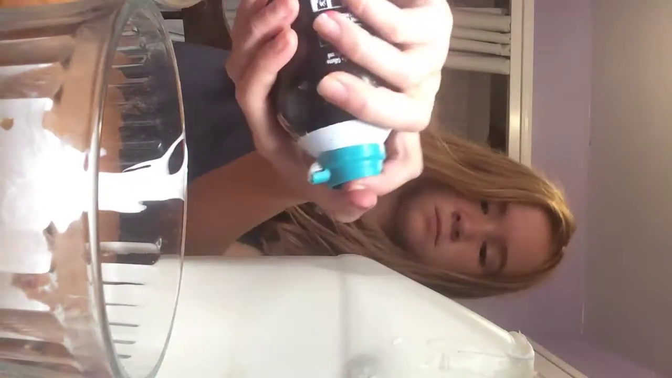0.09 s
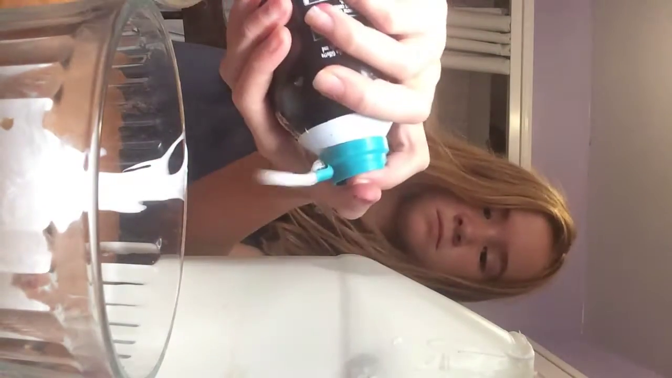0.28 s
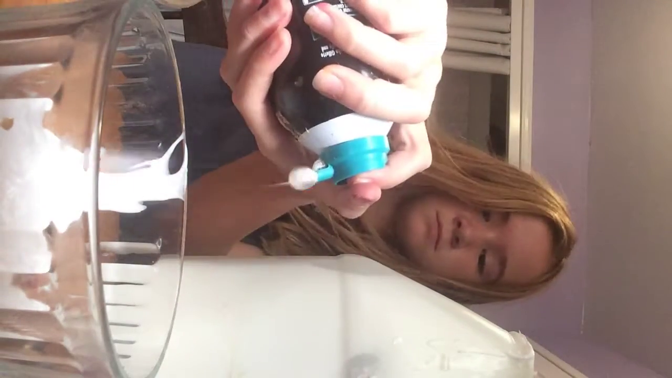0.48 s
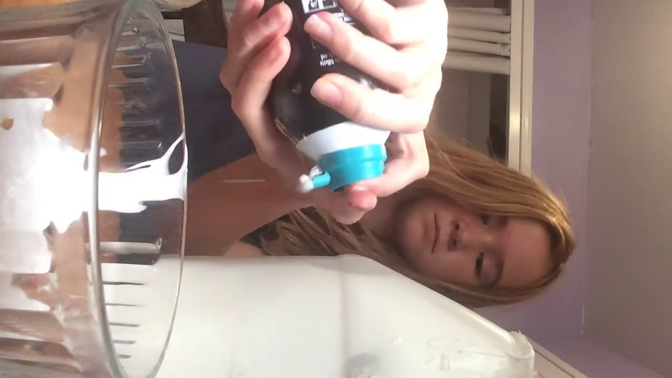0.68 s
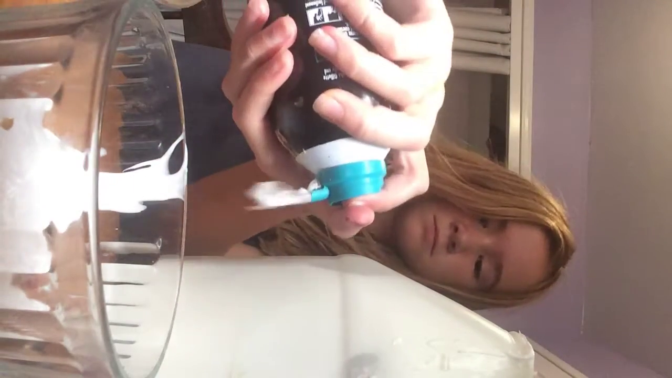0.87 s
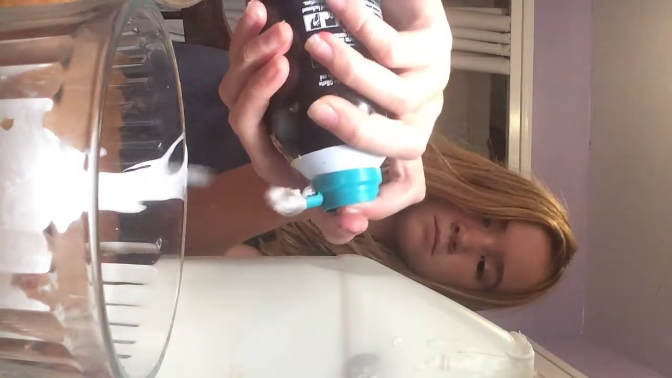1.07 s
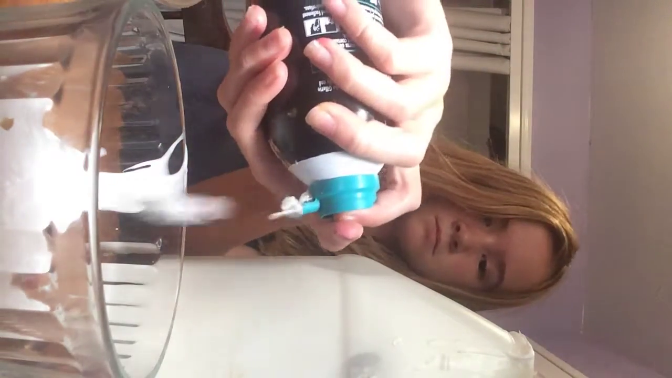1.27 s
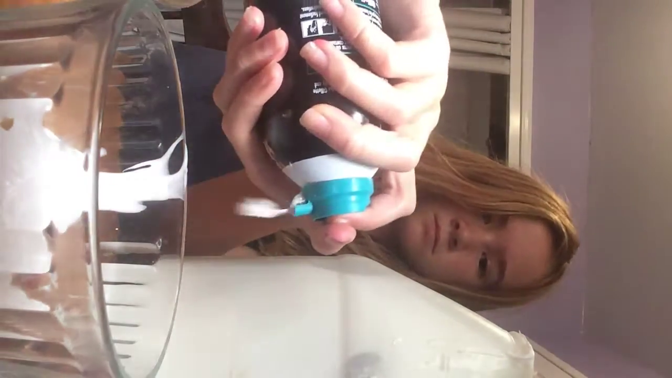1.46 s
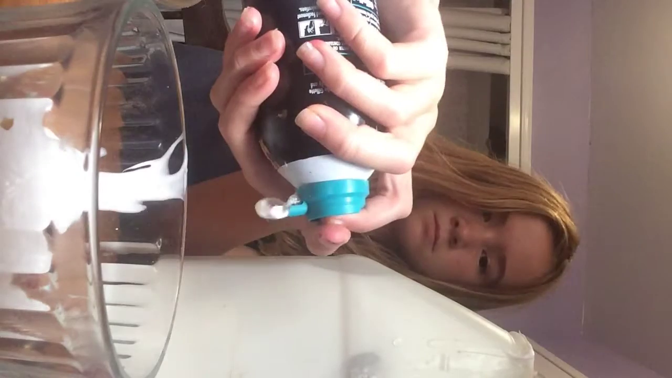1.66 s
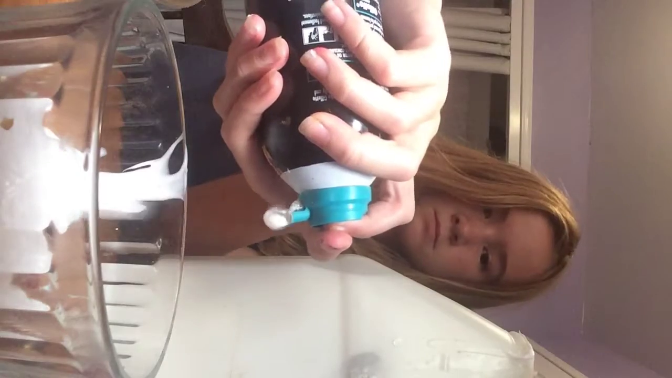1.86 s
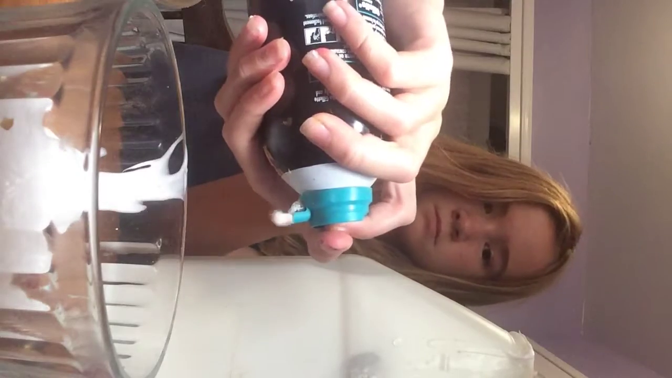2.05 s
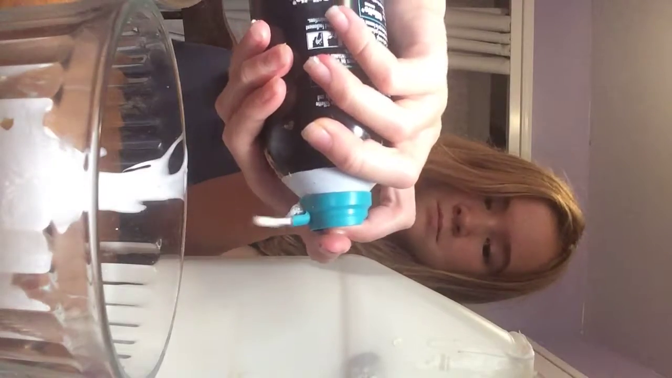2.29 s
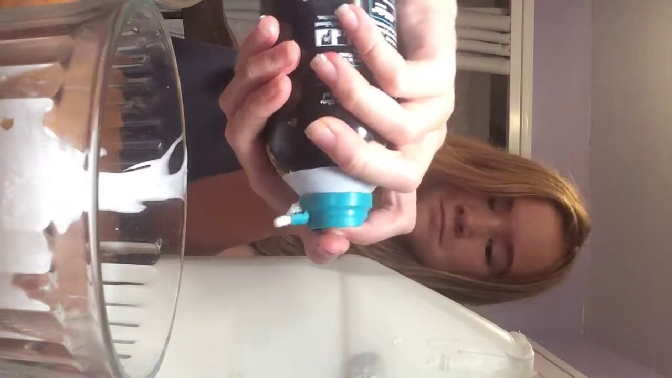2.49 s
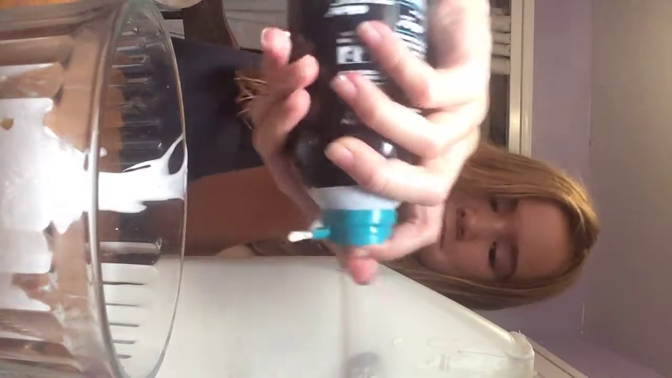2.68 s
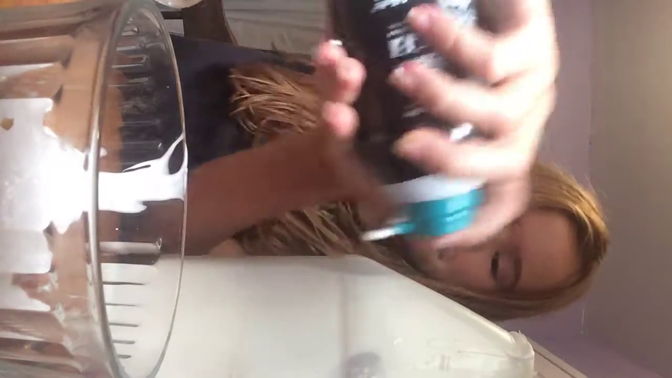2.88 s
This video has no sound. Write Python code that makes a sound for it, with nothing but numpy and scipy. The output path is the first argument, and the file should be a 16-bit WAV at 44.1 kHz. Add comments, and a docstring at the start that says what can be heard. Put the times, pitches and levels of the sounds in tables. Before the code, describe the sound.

An aerosol foam can sputters close to a phone in a small room. Around 0.1-0.3 s gas leaks with a breathy sinking whistle; from 0.4 s weak spits grow into rapid, uneven, gritty crackles, strongest near 1.9 s, ending about 2.7 s. Barely audible knocks come at 0.3 and 0.5 s, a clearer one at 2.7 s, then a tiny bubble pop at 2.8 s. Low rumble; faint hum after 2.2 s.

```python
"""An aerosol can held over a glass bowl spits foam in a small room, close to a phone, over a low rumble.
First gas leaks through the spout: breathy tones at several multiples of one sinking pitch, blurred at random.
Then plugs of foam leave in quick, gritty spurts: noise in four bands, shaped by the rings of spout and bowl.
Gas seeps between them; two soft knocks come early, one near the end, each made of dying sine waves.
A faint low glide comes midway; later a hum sounds with two more soft tones; a last bubble bursts as a short sine."""
import sys
import numpy as np
from scipy import signal
from scipy.fft import rfft, irfft, next_fast_len
from scipy.io import wavfile
from scipy.ndimage import uniform_filter1d, map_coordinates

SR = 44100
rng = np.random.default_rng(int(sys.argv[2]) if len(sys.argv) > 2 else 0)


def digitize_waveform(pressure):
    """Quantize a signal to 16-bit integers and store it at the path in sys.argv[1].

    Rows of a 2-D input are taken as channels; values are limited to [-1, 1].
    """
    field = np.atleast_2d(pressure).T
    bounded = np.clip(field, -1, 1)
    quanta = np.round(bounded * 32767).astype(np.int16)
    wavfile.write(sys.argv[1], SR, quanta)


N = 130095  # length of the scene in samples

# The low rumble's colour. Each row: frequency in Hz, relative strength in dB per Hz.
RUMBLE_COLOUR = [(33, -35.5), (58, -3.5), (140, -2.5), (210, -7), (310, -21), (430, -15), (900, -35),
                 (2690, -36), (16000, -46.5)]
RUMBLE_DB = -56

# How fast the room's echo dies. Each row: frequency in Hz, time to fall by 60 dB in seconds.
ROOM_DECAY = [(1700, 0.19), (6000, 0.13), (14000, 0.13)]
ROOM_DB = -9  # echo against the direct sound

# Soft knocks. Each row: start in seconds, level in dB, pitch as a multiple of the table's tones.
KNOCK_TIMES = [(0.317, -47.5, 3.24), (0.52, -45.5, 0.98), (2.685, -30.5, 3.34)]
# The table's tones at pitch 1. Each row: frequency in Hz, level in dB, time to fall by 60 dB in seconds.
TABLE_TONES = [(88, 5, 0.12), (229.6, 6, 0.16)]
# A last bubble bursting. Each row: start in seconds, level in dB before its soft onset, pitch in Hz.
BUBBLES = [(2.817, -56.5, 2410)]

# The faint hum's path. Each row: time in seconds, pitch in Hz, level in dB.
HUM_PATH = [(2.2, 279.5, -61.5), (2.26, 276.5, -56), (2.36, 284.5, -56.5), (2.45, 285.3, -50.5),
            (2.57, 284.3, -61), (2.68, 286.6, -50.5), (2.83, 283.6, -49.5), (2.9, 288.3, -64)]
# Other soft tones. Each row: start in seconds, length in seconds, first Hz, last Hz, level at the top in dB.
GLIDE_TONES = [(1.032, 0.67, 57, 74.1, -57.5), (2.244, 0.21, 378, 375, -61.5), (2.532, 0.18, 243, 196, -55)]

# The first leak. Each row: time in seconds, tube pitch in Hz, level in dB.
LEAK_PATH = [(.09, 3330, -104), (.105, 3400, -63.5), (.13, 2950, -63.5), (.17, 2440, -59), (.24, 2360, -50),
             (.29, 2230, -68.5), (.42, 2150, -68)]
# The tube's tones. Each row: multiple of the pitch, relative level in dB.
TUBE_TONES = [(1, -8), (2, 4), (2.6, 4.5), (3, 3), (4.7, -4), (6.2, 4)]
LEAK_WOBBLES_PER_S, LEAK_AIR_DB = 650, -4  # breathiness of the lowest tone; hiss against the tones

# Spurts of gas. Each row: start in seconds, length in seconds, level in dB,
# middle band over that level in dB, treble over that level in dB.
SPURT_TIMES = [(0.241, 0.0071, -39, 2.5, 3.5), (0.398, 0.056, -43.5, -14, -19),
               (0.415, 0.019, -38.5, 5, -5), (0.458, 0.031, -36.5, -3.5, -52),
               (0.477, 0.022, -31, 5.5, -9.5), (0.499, 0.017, -31, 4.5, -0.5), (0.519, 0.033, -32, 0, -2.5),
               (0.567, 0.013, -25.5, -6.5, -21), (0.58, 0.016, -30.5, -0.5, -19.0),
               (0.615, 0.018, -29, 3, -18), (0.655, 0.0063, -27.5, -10, -21), (0.68, 0.0085, -25, -1, -23),
               (0.696, 0.0027, -27.5, 9.5, -8), (0.713, 0.01, -26.5, 0.0, -2),
               (0.722, 0.024, -36, -3.5, -8.5), (0.784, 0.019, -27, -8, -31),
               (0.813, 0.026, -33.5, 1.5, -1), (0.875, 0.02, -27.5, -16, -31),
               (0.887, 0.0048, -25.5, 9, -13), (0.935, 0.013, -27.5, -2, -28),
               (0.975, 0.0071, -25.5, 1.5, -7.5), (0.986, 0.028, -29.5, -2.5, -7.5),
               (1.038, 0.0035, -20.5, -5, -14), (1.044, 0.01, -29.5, 2.5, 0.5),
               (1.091, 0.004, -27, -14, -21), (1.097, 0.014, -26.5, 2.5, -10.5), (1.15, 0.021, -26, 0, -8),
               (1.206, 0.032, -29, 3, -3), (1.272, 0.017, -25, -5.5, -22), (1.286, 0.009, -28, 3, -31),
               (1.328, 0.0056, -25.5, 0.5, -20), (1.365, 0.0075, -21, -4.5, -11.5),
               (1.399, 0.0071, -26, -5, -8.5), (1.423, 0.0075, -24.5, -9, -13),
               (1.458, 0.012, -25, -8, -18.5), (1.472, 0.01, -31.5, 1, -16),
               (1.535, 0.012, -26, -4.5, -8.5), (1.599, 0.023, -28, 0, -6), (1.642, 0.013, -38.5, -6, -16),
               (1.681, 0.0092, -24.5, -6.5, -11.5), (1.695, 0.0084, -26.5, -3.5, -19),
               (1.74, 0.0066, -23.5, -8, -10.5), (1.807, 0.0054, -21, -10.5, -36),
               (1.819, 0.014, -23.5, 1, -24), (1.873, 0.018, -30.5, -8.5, -20.5),
               (1.889, 0.0062, -27.5, -13, -12), (1.937, 0.0036, -19.5, -7, -26),
               (1.944, 0.003, -15.5, -8, -8), (1.949, 0.012, -30.5, -6.5, -2.5),
               (2.005, 0.0083, -22.5, 3, -7.5), (2.043, 0.0057, -25.5, -5.5, -10.5),
               (2.052, 0.014, -30, -4, -4.5), (2.162, 0.022, -28.5, -2, -9), (2.223, 0.017, -28, -3, -2.5),
               (2.234, 0.038, -33, 0, -8), (2.258, 0.0033, -27, 1, -4.5), (2.294, 0.013, -26, -8, -10.5),
               (2.303, 0.027, -31.5, -6, -9), (2.383, 0.014, -27, -3, -12.5),
               (2.46, 0.01, -26.5, -4.5, -11), (2.479, 0.0078, -34, 4.5, -7), (2.537, 0.0087, -24, -9, -12),
               (2.553, 0.0089, -27.5, -9, -20), (2.598, 0.0031, -20.5, -22, -13.5),
               (2.603, 0.023, -30.5, -3.5, -11.5), (2.673, 0.011, -34, -12, -18),
               (2.678, 0.02, -30, -7.5, -16.5)]
# Gas seeping between spurts. Each row: time in seconds, level in dB, extra level of the hollow band in dB.
SEEP_PATH = [(.14, -79, -9), (.25, -64, 7), (.33, -70.5, 4), (.39, -61, 36.5), (1.25, -66.5, 37.5),
             (2, -48, -4), (2.12, -79.5, -12), (2.7, -61, 3), (2.8, -82, -11)]
# The jet's own colour. Each row: frequency in Hz, relative strength in dB per Hz.
JET_COLOUR = [(250, -34), (650, -44.5), (1300, -35), (1550, -17.5), (2200, -1.5), (2900, -12.5),
              (4400, -14), (5600, -21), (7300, -23), (10100, -32.5), (16000, -45)]
# Rings of spout and bowl. Each row: frequency in Hz, width at half height in Hz, relative level in dB.
SPOUT_RINGS = [(922, 240, -23.5), (1706.6, 23, -2), (2499, 220, 1.5), (3140, 146, 0), (3670, 53, -6.5),
               (5220, 437, -5), (6030, 736, -2.5), (7790, 140, -16.5)]
# The spout's ring brightens as it clears. Each row: time in seconds, tilt in dB per octave.
CLEARING_TILT = [(1.4, -0.5), (2.7, 9.5)]
TILT_HZ = 2630  # pivot of the tilt
# Borders between the hollow, body, middle and treble bands: three frequencies in Hz.
BAND_EDGES = (1350, 4200, 8000)

ATTACK_S, RELEASE_S, TREBLE_RELEASE_S = 0.0018, 0.0057, 0.0044
SAG_DB_PER_S = 151  # pressure sags while a spurt lasts
POP_DB, POP_S = -6, 0.0013  # the plug lets go with a pop
LEAD_DB, LEAD_S = -17, 0.0047  # a weak hiss swells before the plug lets go
SPITS_PER_S, SPIT_S, SPIT_DB = 380, 0.0017, 7  # bubbles tearing the jet: how often, decay, over the hiss
OWN_SPIT_DB = 2.5  # each band makes a spit stronger or weaker by about this much
PATCH_DB = 2.5  # scatter of the noise colour
HOLLOW_FOLLOWS, HOLLOW_DB = 0.61, -45.5  # the hollow band follows the spurt in part, about this level
HOLLOW_EARLY_S, TREBLE_LATE_S = 0.0047, 0.0037  # a spurt starts hollow and brightens as the spout clears

TOP_HZ, LOW_HZ = 15900, 34  # the phone's limits


def amp(db):
    """Turn dB into a factor."""
    return 10 ** (np.asarray(db) / 20)


def unit(x):
    """Scale x to an average strength (RMS) of one."""
    return x / np.sqrt(np.mean(x ** 2) + 1e-20)


def along(points, hz):
    """Read a table of (Hz, value) rows at hz, on a log frequency axis."""
    f, v = np.transpose(points)
    return np.interp(np.log(hz + 1), np.log(f + 1), v)


def curves(rows):
    """Give one value per sample for each column after the time."""
    s, *cols = np.transpose(rows)
    return [np.interp(np.arange(N) / SR, s, c) for c in cols]


def wobble(rate):
    """Make a smooth random curve with this many random points a second."""
    return map_coordinates(rng.standard_normal(N // 8), [np.arange(N) * rate / SR])


def filtered(x, gain):
    """Give x this gain over frequency, with no ringing ahead of a sound (minimum phase)."""
    m = 2 * next_fast_len(N // 2 + 8192)
    cepstrum = irfft(np.log(gain(np.fft.rfftfreq(m, 1 / SR)) + 1e-6), m)
    # Fold the backward half onto the forward half.
    cepstrum[1:m // 2] *= 2
    cepstrum[m // 2 + 1:] = 0
    return irfft(rfft(x, m) * np.exp(rfft(cepstrum)), m)[:N]


def rumble():
    """The room's low rumble: steady noise, strongest in the bass."""
    noise = filtered(rng.standard_normal(N), lambda hz: amp(along(RUMBLE_COLOUR, hz)))
    return amp(RUMBLE_DB) * unit(noise)


def room(x):
    """Each pitch of the echo dies at its own speed; its noise tail is drawn afresh every 1/20 s."""
    step = SR // 20
    pieces = np.pad(x, (0, -N % step)).reshape(-1, step)
    hz, t, z = signal.stft(rng.standard_normal((len(pieces), SR // 4)), SR, nperseg=128)
    decay = amp(-60 * t / np.abs(along(ROOM_DECAY, hz))[:, None])
    tails = signal.istft(z * decay, SR, nperseg=128)[1]
    tails = tails / np.linalg.norm(tails, axis=1, keepdims=True)
    wet = signal.fftconvolve(pieces, tails, axes=1)
    # Add the echoes at their places, 150 samples after the direct sound.
    at = np.arange(len(pieces))[:, None] * step + np.arange(wet.shape[1]) + 150
    return np.bincount(at.ravel(), wet.ravel())[:N]


def knocks():
    """Soft knocks on the table: its tones start softly and die away, faster at a higher pitch."""
    out, t = np.zeros(N + SR), np.arange(SR // 4) / SR
    for s, db, pitch in KNOCK_TIMES:
        ring = np.zeros(len(t))
        for hz, tone_db, t60 in TABLE_TONES:
            ring += amp(tone_db - 60 * pitch ** 2 * t / t60) * np.sin(2 * np.pi * pitch * hz * t)
        onset = 1 - np.exp(-pitch * t / 0.006)
        out[round(s * SR):][:len(t)] += amp(db) * ring * onset
    return out[:N]


def last_bubble():
    """A bursting bubble rings as one short tone that dies quickly."""
    out, t = np.zeros(N + SR), np.arange(SR // 4) / SR
    for s, db, hz in BUBBLES:
        onset = 1 - np.exp(-t / 0.0012)
        out[round(s * SR):][:len(t)] += amp(db - 60 * t / 0.033) * np.sin(2 * np.pi * hz * t) * onset
    return out[:N]


def glides():
    """Short soft sine tones that swell, fade and glide in pitch."""
    out, t = np.zeros(N), np.arange(N) / SR
    for s, length, from_hz, to_hz, db in GLIDE_TONES:
        progress = np.clip((t - s) / length, 0, 1)
        hz = from_hz + (to_hz - from_hz) * progress
        out += amp(db) * np.sin(np.pi * progress) * np.sin(2 * np.pi * np.cumsum(hz) / SR)
    return np.sqrt(2) * out  # levels are RMS


def hum():
    """A faint pure sine that wavers in pitch and swells twice."""
    hz, db = curves(HUM_PATH)
    started = np.arange(N) / SR > HUM_PATH[0][0]
    return np.sqrt(2) * amp(db) * started * np.sin(2 * np.pi * np.cumsum(hz) / SR)


def leak():
    """Breathy tube tones that sink as foam fills the spout, with airy hiss."""
    pitch, db = curves(LEAK_PATH)
    phase, t = 2 * np.pi * np.cumsum(pitch) / SR, np.arange(N) / SR
    tones = np.zeros(N)
    for k, tone_db in TUBE_TONES:
        # Random wobbles in strength blur each tone, more for the higher ones.
        rate = LEAK_WOBBLES_PER_S * np.sqrt(k)
        tones += amp(tone_db) * (wobble(rate) * np.cos(k * phase) + wobble(rate) * np.sin(k * phase))
    air = unit(filtered(rng.standard_normal(N), lambda hz: hz / (hz + 4000)))
    sounding = (t > LEAK_PATH[0][0]) * (t < LEAK_PATH[-1][0])
    return amp(db) * sounding * (unit(tones) + amp(LEAK_AIR_DB) * air)


def patchy(patch_db, tilted):
    """Noise whose colour drifts in small patches; if tilted, it brightens as the spout clears."""
    hz, t, z = signal.stft(rng.standard_normal(N + 512), SR, nperseg=256)
    patches = uniform_filter1d(rng.standard_normal(z.shape), size=3, axis=0)
    patches = uniform_filter1d(patches, size=3, axis=1)
    octaves = np.clip(np.log2((hz + 1) / TILT_HZ), -0.5, 0.5)  # the tilt levels off half an octave away
    tilt_db = tilted * np.outer(octaves, np.interp(t, *np.transpose(CLEARING_TILT)))
    return unit(signal.istft(z * amp(patch_db * unit(patches) + tilt_db), nperseg=256)[1][:N])


def spout(hz):
    """The jet's colour with the rings of spout and bowl on top, as a gain."""
    rings = sum(amp(2 * db) / (1 + (2 * (hz - c) / w) ** 2) ** 2 for c, w, db in SPOUT_RINGS)
    return np.sqrt(amp(2 * along(JET_COLOUR, hz)) + rings)


def band_gain(k):
    """The spout's gain within band k alone, with steep sides."""
    edges = [1, *BAND_EDGES, SR]

    def under(hz, edge):
        return 1 / (1 + (hz / edge) ** 16)

    return lambda hz: spout(hz) * np.sqrt(np.abs(under(hz, edges[k + 1]) - under(hz, edges[k])))


def spitting(kicks):
    """Bubbles tear the jet: sudden short swells on a steady hiss, evened out over 1/60 s."""
    sized = kicks * amp(SPIT_DB + OWN_SPIT_DB * rng.standard_normal(N))
    swell = 1 + signal.lfilter([1], [1, -np.exp(-1 / (SPIT_S * SR))], sized)
    return swell / np.sqrt(np.abs(uniform_filter1d(swell ** 2, size=SR // 60)))


def spurt_shape(after, length, release_s):
    """A plug lets go with a pop after a weak hiss; pressure sags, then the spurt dies away."""
    opening = amp(-SAG_DB_PER_S * (after - length / 2)) / (1 + np.exp(-after / ATTACK_S))
    opening += amp(LEAD_DB) * np.exp(after / LEAD_S) * (after < 0)
    opening += amp(POP_DB) * np.exp(-np.abs(after) / POP_S) * (after >= 0)
    return opening * np.exp(-np.clip(after - length, 0, None) / release_s)


def spurts():
    """Spurts and seeping gas: four bands of jet noise share the same spits and nearly the same timing."""
    t = np.arange(N) / SR
    kicks = (rng.random(N) < SPITS_PER_S / SR) * rng.random(N)
    seep_db, seep_hollow_db = curves(SEEP_PATH)
    seep = amp(seep_db) * (t > SEEP_PATH[0][0])
    hz = np.linspace(0, SR / 2, num=4000)
    size = [np.sqrt(np.mean(band_gain(k)(hz) ** 2)) for k in range(4)]
    mean_db = np.mean(SPURT_TIMES, axis=0)[2]
    out = np.zeros(N)
    for k in range(4):  # hollow, body, middle, treble
        natural = size[k] / size[1]  # the band's own strength against the body
        power = (seep * natural * (amp(seep_hollow_db) if k == 0 else 1)) ** 2
        release_s = TREBLE_RELEASE_S if k == 3 else RELEASE_S
        for start, length, db, middle_db, treble_db in SPURT_TIMES:
            s = start + [-HOLLOW_EARLY_S, 0, 0, TREBLE_LATE_S][k]
            i = slice(int((s - 0.03) * SR), int((s + length + 0.1) * SR))
            hollow_db = HOLLOW_DB + HOLLOW_FOLLOWS * (db - mean_db)
            band_db = [hollow_db, db, db + middle_db, db + treble_db][k]
            power[i] += (amp(band_db) * spurt_shape(t[i] - s, length, release_s)) ** 2
        noise = np.sqrt(power) * spitting(kicks) * patchy(PATCH_DB, k == 1)
        out += filtered(noise, band_gain(k)) / size[k]
    return out


def scene():
    """Can, knocks and bubble with their echo, over hum, gliding tones and rumble."""
    near = spurts() + leak() + knocks() + last_bubble()
    return (near + amp(ROOM_DB) * room(near) + hum() + glides() + rumble())[None]


def record(dry):
    """The phone keeps nothing above its top limit and little deep bass."""
    hz = np.fft.rfftfreq(N, 1 / SR)
    return irfft(rfft(dry) * (hz < TOP_HZ) / (1 + (LOW_HZ / (hz + 1)) ** 4), N)


dry = scene()
out = record(dry)
digitize_waveform(out)
```